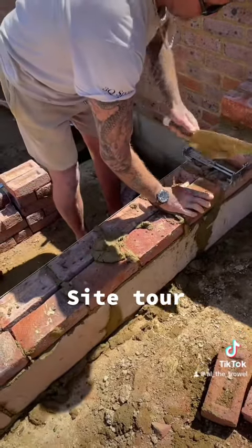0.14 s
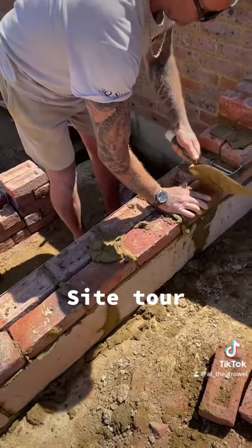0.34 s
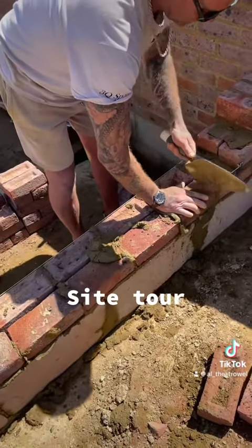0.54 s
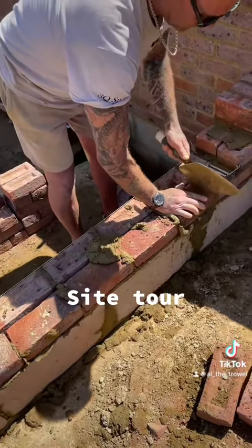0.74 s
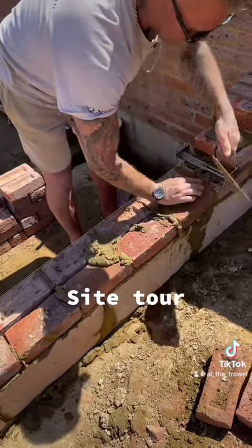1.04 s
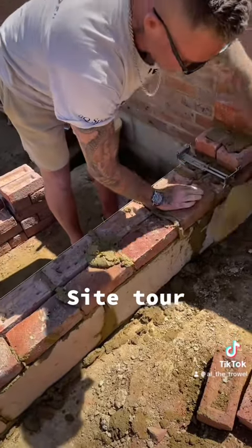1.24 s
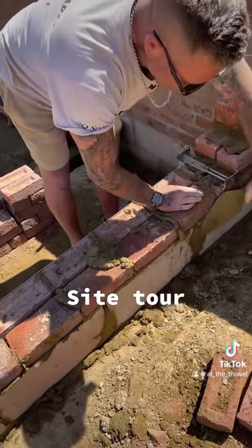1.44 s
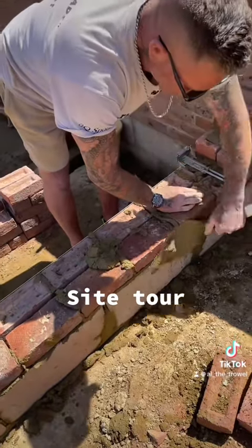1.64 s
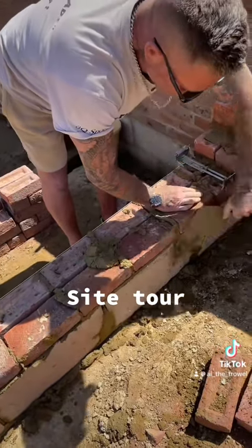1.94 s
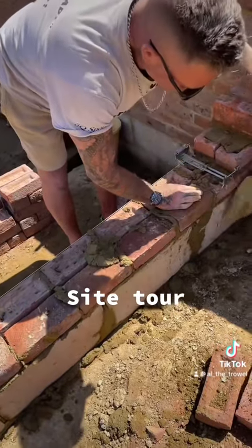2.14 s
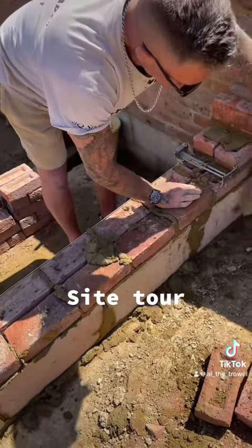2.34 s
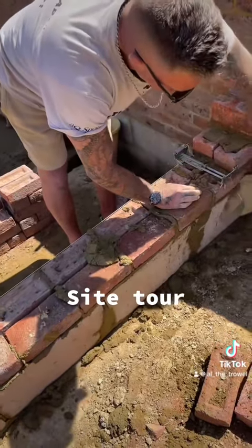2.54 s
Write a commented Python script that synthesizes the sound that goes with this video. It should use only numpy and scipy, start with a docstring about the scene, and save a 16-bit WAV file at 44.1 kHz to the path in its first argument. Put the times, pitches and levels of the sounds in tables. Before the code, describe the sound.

A steel trowel taps a brick twice, then scrapes and jabs through gritty mortar.

```python
"""An outdoor building site, one microphone close to the wall where a bricklayer beds a brick.
Two taps of the steel trowel knock the brick down and echo off the site walls. The blade then scrapes
twice along the joint, sand hissing under it and coarse grains ringing the steel, and finishes with
a quick run of short jabs. In the distance lies only a faint rumble."""
import sys
import numpy as np
from scipy import signal
from scipy.fft import rfft, irfft
from scipy.io import wavfile

SR = 44100
rng = np.random.default_rng(int(sys.argv[2]) if len(sys.argv) > 2 else 0)


def persist_wave(psi):
    """Save psi, clipped to +-1, as 16-bit WAV."""
    counts = np.round(np.clip(psi, -1, 1) * 32767).astype(np.int16)
    wavfile.write(sys.argv[1], SR, np.atleast_2d(counts).T)


N = 119070
T = np.arange(N) / SR

# trowel taps on the brick: t/s, level/dB, contact brightness f/Hz, crushed grit level/dB
TAPS = [(0.2127, -10, 3300, -33.5), (0.4016, -14.5, 2370, -39)]
# spectrum of sand against steel: f/Hz, level/dB
SAND_SPECTRUM = [(120, -9.5), (300, -16), (900, -4), (2000, 3), (3600, 0.5), (5900, 1), (6650, -0.5),
                 (7300, 2.5), (8800, 4), (10200, -1), (11500, -4), (15500, -5)]
SHIFTS_PER_S = 16   # the moving contact favours other modes of the blade
ECHO_CUT_HZ = 6000   # reflections come back dull


def from_db(db):
    """Decibels to gain."""
    return 10 ** (np.asarray(db) / 20)


def rms_one(x):
    """Scale to unit rms."""
    return x / np.sqrt(np.mean(x ** 2) + 1e-20)


def level(rows):
    """Gain along a curve of t/s, level/dB; silent outside it."""
    s, db = np.transpose(rows)
    return from_db(np.interp(T, s, db, left=-200, right=-200))


def decay(start, t60):
    """Exponential release from a given moment."""
    return (T >= start) * np.exp(-np.log(1000) * np.maximum(T - start, 0) / t60)


def click(s):
    """Unit impulse."""
    return (np.arange(N) == int(s * SR)) + 1e-18


def noise():
    """White noise."""
    return rng.standard_normal(N)


def wander(per_s):
    """Slow random movement with a spread of about 1."""
    knots = rng.standard_normal(1000)
    return np.interp(T * per_s, np.arange(len(knots)), knots)


def lowpass(x, hz):
    """Gentle treble loss."""
    return signal.sosfilt(signal.butter(2, min(hz, .45 * SR), fs=SR, output="sos"), x)


def colour(x, spectrum):
    """Give a steady signal a spectrum; rms 1."""
    hz, db = np.transpose(spectrum)
    f = np.maximum(np.arange(N // 2 + 1) * SR / N, 1)
    gain = from_db(np.interp(np.log(f), np.log(hz), db))
    return rms_one(irfft(rfft(x) * gain, N))


def ring(x, hz, t60):
    """A unit click rings a decaying cosine of height 1."""
    r, w = np.exp(-np.log(1000) / (t60 * SR)), 2 * np.pi * hz / SR
    return signal.lfilter([.5, 0, -.5], [1, -2 * r * np.cos(w), r * r], x)


def resonate(x, hz, width_hz):
    """Resonance that keeps the rms of white noise."""
    r, w = np.exp(-np.pi * width_hz / SR), 2 * np.pi * hz / SR
    return signal.lfilter([1, 0, -1], [1, -2 * r * np.cos(w), r * r], x) * np.sqrt((1 - r * r) / 2)


def grains(per_s, spread_db):
    """Random clicks, mostly small with a few large; rms 1."""
    sizes = from_db(spread_db * np.minimum(rng.exponential(1, N), 5))
    signs = rng.choice([-1, 1], N)
    return rms_one(sizes * signs * (rng.random(N) < per_s / SR))


def taps():
    """Each tap rings the brick briefly and crushes the sand under the trowel's edge."""
    # modes of the bedded brick and the trowel: f/Hz, level/dB, t60/s
    brick_modes = [(175, -28, .04), (500, -17, .038), (725, -30, .03), (1175, -4, .013), (1285, 0, .017),
                   (1640, -12, .018), (2050, -4, .019), (2220, -8, .013), (2700, -5, .0095),
                   (4280, -13, .016), (4790, -11, .015), (5390, -5, .016), (2140, -44, .45)]
    # spectrum of crushed sand: f/Hz, level/dB
    crush_spectrum = [(300, -21), (800, -19), (1300, -2.5), (2600, 13), (3600, -12), (4900, 1.5),
                      (6300, -9), (10000, -4.5), (12500, -10), (14500, -4.5), (16000, -14)]
    touch_db, seat_s = -13.5, .00085   # the edge touches, then seats fully
    radiate_hz = 139   # the brick is too small to radiate below this
    out = 0
    for s, db, bright_hz, grit_db in TAPS:
        seated = s + seat_s
        contact = from_db(touch_db) * click(s) + click(seated)
        force = from_db(db) * lowpass(lowpass(contact, bright_hz), bright_hz)
        knock = sum(from_db(mode_db) * ring(force, hz, t60) for hz, mode_db, t60 in brick_modes) / 2
        crush = decay(seated, t60=.026)
        crumble = from_db(-1) * decay(seated, t60=.04)
        grit = from_db(grit_db) * (crush + crumble) * colour(noise(), crush_spectrum)
        out = out + knock + grit
    return signal.sosfilt(signal.butter(2, radiate_hz, "high", fs=SR, output="sos"), out)


def shudder(below_tap_db=34, rise_s=.006):
    """The wall and its wet bed answer each tap with a short, pitchless thud."""
    # spectrum of the shaken wall: f/Hz, level/dB
    wall_spectrum = [(100, -17), (240, 6.5), (400, -4.5), (650, -1.5), (1000, 1.5), (2300, -4),
                     (3300, -20.5)]
    swell = sum(from_db(db - below_tap_db) * decay(s, t60=.07) * np.clip((T - s) / rise_s, 0, 1)
                for s, db, _, _ in TAPS)
    return swell * colour(noise(), wall_spectrum)


def strokes():
    """Two long passes of the blade along the joint, over wet mortar."""
    # friction along the first pass: t/s, level/dB
    first_friction = [(.99, -81), (1.012, -65), (1.03, -69), (1.055, -61), (1.064, -51.5), (1.092, -49.5),
                      (1.102, -56), (1.19, -47), (1.244, -42), (1.258, -40), (1.305, -43), (1.325, -47.5),
                      (1.35, -48.5), (1.392, -62.5), (1.412, -80), (1.43, -77)]
    # friction along the second pass: t/s, level/dB
    second_friction = [(1.43, -67), (1.455, -53.5), (1.5, -50), (1.54, -41.5), (1.615, -36.5),
                       (1.66, -38.5), (1.685, -46.5), (1.703, -42), (1.742, -44.5), (1.762, -75),
                       (1.83, -83.5), (1.95, -110)]
    # how much mortar is squeezed: t/s, level/dB
    squeeze = [(1.08, -73.5), (1.19, -58), (1.26, -63.5), (1.32, -54), (1.40, -76), (1.49, -63),
               (1.525, -47.5), (1.57, -52.5), (1.67, -57), (1.705, -50), (1.75, -73)]
    mortar = level(squeeze) * squelch()
    first = scrape(level(first_friction), sand_db=-.69, shimmer_db=-3.5)
    second = scrape(level(second_friction), sand_db=-2.4, shimmer_db=-5)
    return first + second + rasp() + mortar


def jabs(attack_s=.0025):
    """The blade bites, holds and lets go; in the final run it also thuds into the wall."""
    # jabs and catches of the blade: t/s, hold/s, level/dB
    bites = [(1.254, 0.004, -44), (1.383, 0.0016, -34), (1.461, 0.0031, -33.5), (1.7, 0.0037, -35),
             (1.787, .004, -51), (2.063, 0.0036, -64), (2.101, 0.0063, -39.5), (2.112, 0.0042, -41.5),
             (2.137, 0.0059, -35.5), (2.155, 0.0055, -45), (2.174, 0.005, -54), (2.187, 0.031, -44.5),
             (2.23, 0.016, -37.5), (2.264, .014, -35.5), (2.311, 0.013, -37), (2.352, 0.021, -38),
             (2.384, 0.016, -39.5), (2.402, 0.0039, -32), (2.434, 0.0076, -37)]
    # light drag through the final run: t/s, level/dB
    drag = [(2.1, -65), (2.135, -57.5), (2.17, -44), (2.23, -54), (2.3, -63), (2.42, -48.5), (2.45, -63),
            (2.48, -102)]
    # spectrum of the wall's dull thud: f/Hz, level/dB
    thud_spectrum = [(90, -14), (150, -9), (215, 5.5), (320, -1), (600, -4.5), (1200, -43)]
    friction = level(drag)
    for s, hold, db in bites:
        attack = np.clip((T - s) / attack_s, 0, 1)
        release = np.maximum(T < s + hold, decay(s + hold, t60=.013))
        friction += from_db(db) * attack * release
    final_run = T > drag[0][0]
    thud = from_db(-17) * friction * final_run * colour(noise(), thud_spectrum)
    return scrape(friction, sand_db=-7.5, shimmer_db=-12) + thud


def scrape(friction, sand_db, shimmer_db):
    """Fine sand hisses under the chattering blade; coarse grains catch and ring the steel."""
    # resonances of the rubbing blade: f/Hz, width/Hz, level/dB
    blade_modes = [(590, 38.6, -19.5), (831.2, 30, -15.5), (1057, 54, -23), (1290, 54, -12),
                   (1513, 180, -14), (1950, 120, -16), (2926, 420, -20), (4960, 850, -14.5),
                   (6140, 83, -17), (7000, 67, -46), (8870, 260, -62)]
    chatter_db, chatter_hz, shift_db = 2, 27, 2
    friction = friction * from_db(chatter_db * rms_one(lowpass(noise(), chatter_hz)))
    hiss = from_db(sand_db) * friction * sand()
    catches = friction * grains(per_s=1500, spread_db=3)
    blade = 0
    for k, (hz, width, db) in enumerate(blade_modes):
        gain = from_db(db + shift_db * wander(SHIFTS_PER_S))
        blade = blade + (-1) ** k * gain * resonate(catches, hz, width)
    return hiss + blade + from_db(shimmer_db) * shimmer(catches)


def sand():
    """Fine grains click so densely that they merge into a hiss."""
    return colour(grains(per_s=9000, spread_db=2.5), SAND_SPECTRUM)


def shimmer(drive, low_hz=1706, high_hz=10530, count=36):
    """The steel plate's many high modes, each swelling and fading as the contact moves."""
    step = (high_hz - low_hz) / count
    pitches = low_hz + step * (np.arange(count) + rng.random(count))
    modes = sum(resonate(drive, hz, width_hz=60) * wander(SHIFTS_PER_S) for hz in pitches)
    return modes / np.sqrt(count)


def rasp(width_hz=104):
    """Coarse grains drive one blade resonance, whose pitch glides with the point of contact."""
    # course of the resonance: t/s, level/dB, f/Hz
    glide = [(1.03, -113, 1250), (1.075, -57.5, 1290), (1.16, -52, 1253), (1.183, -38.5, 1390),
             (1.221, -73, 1240), (1.253, -44, 1300), (1.296, -40.5, 1155), (1.319, -46, 1190),
             (1.362, -44.5, 1290), (1.42, -70.5, 1160), (1.46, -42, 1310), (1.482, -55, 1280),
             (1.53, -47, 1140), (1.59, -49.5, 1360), (1.659, -42, 1293), (1.69, -52, 1395),
             (1.736, -51, 1570), (1.767, -96, 1400)]
    s, db, hz = np.transpose(glide)
    carrier = np.exp(2j * np.pi * np.cumsum(np.interp(T, s, hz)) / SR)
    pole = np.exp(-np.pi * width_hz / SR)
    # shift down, smooth, shift back up: the resonance follows the carrier
    smoothed = signal.lfilter([1], [1, -pole], grains(per_s=3000, spread_db=4) / carrier)
    ringing = (smoothed * carrier).real
    return level(list(zip(s, db))) * rms_one(lowpass(ringing, 2 * hz.mean()))


def flexes(bend_hz=821.6):
    """The blade's low bending mode, quickly damped by the mortar."""
    # the blade lands or springs free: t/s, level/dB
    kicks = [(1.648, -36.5), (1.672, -37), (1.70, -37), (1.733, -43), (2.1015, -34), (2.277, -40.5),
             (2.357, -39.5), (2.407, -45.5)]
    force = sum(from_db(db) * click(s) for s, db in kicks)
    return ring(lowpass(force, 2 * bend_hz), bend_hz, t60=.07)


def squelch(low_hz=247, high_hz=540, pops_per_s=500, cycles=25, count=10):
    """Small air pockets pop in the wet mortar, each ringing briefly."""
    pops = sum(ring(grains(pops_per_s / count, spread_db=.5), hz, t60=cycles / hz)
               for hz in np.geomspace(low_hz, high_hz, count))
    return rms_one(lowpass(pops, 2 * high_hz))


def brushes():
    """Hand and cloth brush lightly over the gritty brick."""
    # soft swells of grit: middle t/s, half length/s, level/dB
    swells = [(0.459, 0.018, -70.5), (0.572, 0.05, -78), (.81, 0.024, -81.5), (0.954, 0.038, -78),
              (2.493, 0.048, -85), (2.685, 0.025, -80.5)]
    return sum(from_db(db) * np.exp(-((T - s) / half) ** 2) for s, half, db in swells) * sand()


def ground_bounce(x, delay_s=.0102):
    """A dull reflection off the ground reaches the microphone just after the direct sound."""
    return from_db(-26.5) * lowpass(np.interp(T - delay_s, T, x), ECHO_CUT_HZ)


def site_echoes(x, smear_s=.005):
    """Dull echoes from rough brickwork, near scatter from the ground and a faint long tail."""
    # returns from the surrounding walls: delay t/s, level/dB
    echoes = [(0.068, -36), (.077, -39), (0.118, -48.5)]
    # spectrum of the site's diffuse sound: f/Hz, level/dB
    tail_spectrum = [(150, 1), (500, -2.5), (900, -1.5), (1290, -10), (1600, -3), (2250, -5), (2900, -7),
                     (9000, -5), (15000, -15.5)]

    def diffuse():
        return colour(noise(), tail_spectrum)

    def unit_energy(response):
        return rms_one(response) / np.sqrt(N)

    walls = 0
    for s, db in echoes:
        smear = np.exp(-((T - s) / smear_s) ** 2)
        walls = walls + from_db(db) * unit_energy(lowpass(diffuse(), ECHO_CUT_HZ) * smear)
    near = from_db(-26) * unit_energy(diffuse() * decay(.0092, t60=.07))
    far = from_db(-33.5) * unit_energy(diffuse() * decay(.02, t60=.6))
    return signal.fftconvolve(x, walls + near + far)[:N]


def dying_echo(band_hz=(900, 2500)):
    """At the start, the echo of an earlier tap is still dying away."""
    wash = signal.sosfilt(signal.butter(2, band_hz, "band", fs=SR, output="sos"), noise())
    return from_db(-68.5) * decay(0, t60=.55) * rms_one(wash)


def background(hum_hz=88.1):
    """Quiet open air and a wavering hum in the distance."""
    # spectrum of the outdoor rumble: f/Hz, level/dB
    air_spectrum = [(25, 4), (55, -5), (100, -8), (180, -8.5), (280, -17.5), (600, -27), (950, -22.5),
                    (1600, -25), (3500, -37.5), (9000, -37), (15000, -44)]
    air = colour(noise(), air_spectrum)
    hum = rms_one(lowpass(resonate(noise(), hum_hz, width_hz=14), 2 * hum_hz))
    return from_db(-72) * (air + hum)


def scene():
    """Trowel work close up, the open site behind it; mono."""
    work = taps() + shudder() + flexes() + strokes() + jabs() + brushes()
    return (work + ground_bounce(work) + dying_echo() + site_echoes(work) + background())[None]


def record(dry):
    """The microphone signal is cut steeply at the top."""
    cutoff_hz = 15800
    return signal.sosfilt(signal.ellip(10, .1, 70, cutoff_hz, fs=SR, output="sos"), dry)


dry = scene()
out = record(dry)
persist_wave(out)
```